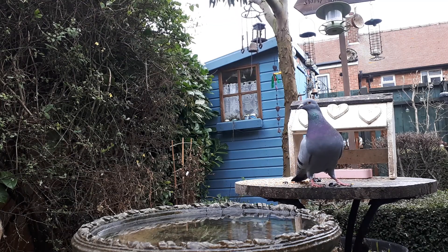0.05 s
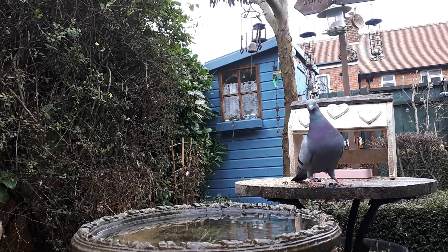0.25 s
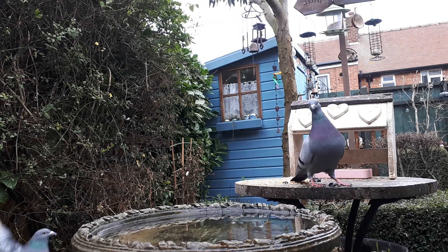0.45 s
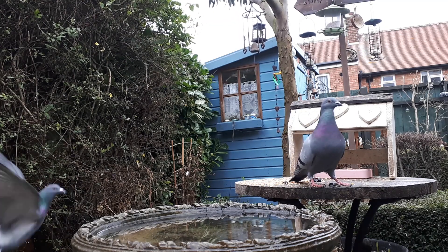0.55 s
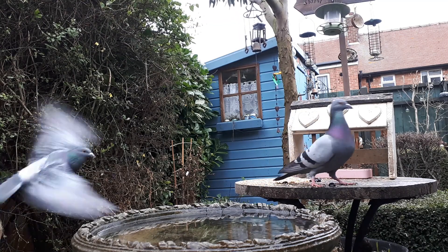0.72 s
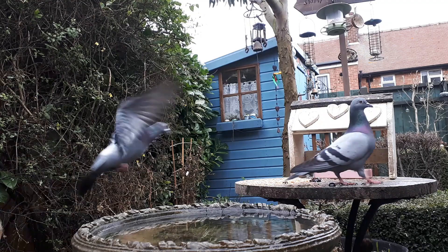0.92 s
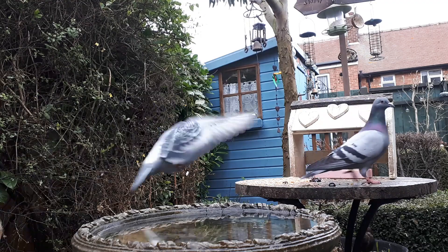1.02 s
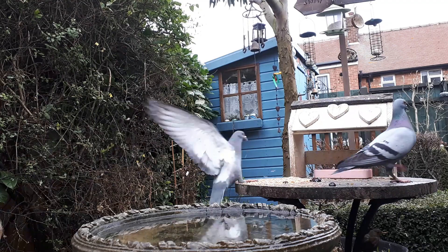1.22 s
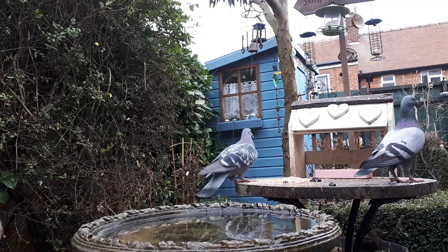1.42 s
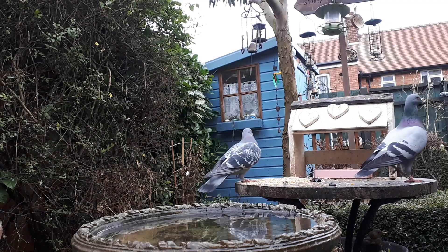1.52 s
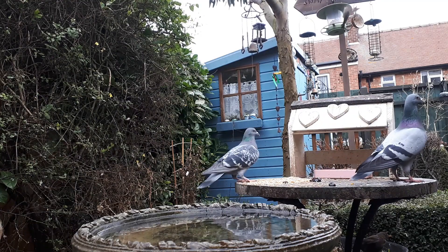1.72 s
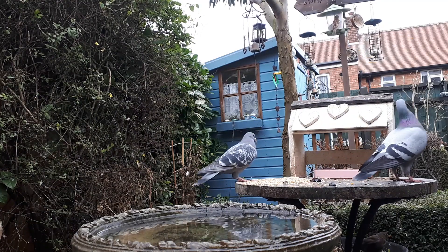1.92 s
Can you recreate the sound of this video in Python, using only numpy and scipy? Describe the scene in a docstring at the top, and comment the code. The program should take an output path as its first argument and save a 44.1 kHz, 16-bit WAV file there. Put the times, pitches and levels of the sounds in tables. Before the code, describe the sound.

Rapid pigeon wing flaps, airy and whistling with snappy feather flicks, end in light knocks and feather rustle; a harsh bird squawks midway and rasps at landing, over faint outdoor rumble, close microphone, mostly left.

```python
"""A pigeon flies in close on the left and lands on a garden table, at about eight downstrokes a second.
Downstrokes: arching whistle tones plus swish and hiss noise. Upstrokes: low hums. Flicks: noise bursts.
Downdraught puffs buffet the microphone. Touchdown: knocks, then wings rustling and squeaking shut.
A harsh-voiced bird in the hedge, perhaps a starling, squawks, then rasps: rough partials and hiss.
Distant town rumble, light gusts and short garden echoes lie around them."""
import sys
import numpy as np
from scipy import signal
from scipy.fft import rfft, irfft
from scipy.io import wavfile
from scipy.ndimage import uniform_filter1d

SR = 44100
rng = np.random.default_rng(int(sys.argv[2]) if len(sys.argv) > 2 else 0)


def unload_wav(signal):
    """Save mono or channel-first audio to the path in sys.argv[1] as 16-bit WAV at rate SR, clipped to [-1, 1]."""
    wavfile.write(
        sys.argv[1],
        SR,
        np.round(np.clip(np.atleast_2d(signal).T, -1, 1) * 32767).astype(np.int16),
    )


N = 85995
T = np.arange(N) / SR

# All spectra: freq_hz, relative_level_db (normalised by colour()).
# Half-widths run from the centre to exp(-2) of the peak.
# Garden air
GARDEN_SPECTRUM = [(20, -0.5), (45, 9.5), (75, 4), (130, -2), (220, -12.5), (450, -17.5), (900, -18),
                   (2000, -30.5), (4000, -35.5), (7500, -34.5), (9000, -39), (15500, -36)]
GARDEN_LEFT_DB, GARDEN_RIGHT_DB, GARDEN_CORRELATION = -55, -57.5, 0.34
# Downdraught puffs: centre_s, peak_spacing_s, peak_db, left_over_right_db
PUFFS = [(.115, 0.0067, -37.5, 18), (0.3254, 0.0032, -29.5, 17), (0.3362, 0.0043, -24, 25),
         (0.366, .005, -31, 30), (0.396, 0.0054, -33, 17), (.617, 0.0035, -29, 20),
         (0.636, 0.0031, -27, 32), (0.659, 0.003, -31.5, 11), (0.676, 0.0035, -25, 25),
         (0.679, 0.0048, -52.5, -23.5), (0.803, 0.0053, -39.5, 17), (.823, 0.0044, -40.5, 18),
         (0.857, 0.0056, -41, 24), (0.953, 0.0028, -40.5, 17), (0.982, 0.0056, -38.5, 23),
         (1.045, 0.0048, -55, -17.5)]
# Pigeon fade-in: its wingbeats come in quickly with the first downstroke
ENTRY_START_S, ENTRY_RISE_S = 0.13, 0.042
# Downstrokes: centre_s, stroke_length_s, whistle_hz, glide_hz_per_s, whistle_db, overtone_db, swish_db,
# hiss_db, left_over_right_db (whistle fundamental)
DOWNSTROKES = [(0.176, .05, 888, -3000, -69, 23, -56, -57.5, 22),
               (0.256, 0.078, 717, -1400, -55, -19, -48, -56.5, 8),
               (.362, 0.066, 720, -700, -43, -0.5, -47, -60.5, 9.5),
               (0.498, .045, 795, 1016, -43.5, 9, -65, -55, 15),
               (.622, 0.054, 686, -900, -43, 3, -51, -56.5, 6.5),
               (0.755, 0.05, 679.4, -1000, -49, 3.5, -59, -60, 14),
               (0.895, .05, 694, 895.5, -43.5, 3.5, -58, -60, 10),
               (1.015, .058, 695.7, 499, -44.5, 0, -54, -61.5, 7.5),
               (1.155, 0.047, 626.3, 3203.5, -42.5, 0.5, -58, -64.5, 5)]
# Whistle partials, fundamental first: relative_level_db
WHISTLE_PARTIALS_DB = [2, -11, -18.5, -29.5]
WHISTLE_ARCH_PER_S2, WHISTLE_JITTER_RMS, WHISTLE_FLUTTER_RMS_DB = 72, 0.0391, 4
# Air through the flight feathers
SWISH_SPECTRUM = [(200, -30), (480, -9.5), (700, 1.5), (1050, 1), (1600, 5.5), (2200, 4), (3200, -5.5),
                  (6000, -24), (15000, -47)]
HISS_SPECTRUM = [(500, 0.5), (2000, -0.5), (3700, -2.5), (6000, 1.5), (7600, 5), (8600, -11), (12000, -7.5),
                 (15500, -8.5)]
# Feather rustles in flight and as the wings shut: centre_s, rustle_length_s, level_db
RUSTLES = [(0.223, .04, -59.5), (1.292, 0.061, -52.5), (1.381, 0.02, -54), (1.424, 0.029, -45),
           (1.475, 0.11, -54), (1.657, 0.11, -60.5)]
RUSTLE_SPECTRUM = [(100, 7), (350, 7.5), (900, 5.5), (1600, 5.5), (4200, 2.5), (6000, 0.5), (7900, -5),
                   (8800, -8.5), (15500, -8.5)]
# Feather flicks at the top of the stroke: start_s, level_db, decay_s
FLICKS = [(.272, -65, .004), (.322, -37, 0.011), (.4475, -43, 0.013), (.574, -36.5, 0.0068),
          (.7025, -39, 0.0084), (.8426, -47, 0.0043), (.857, -53.5, 0.0022), (.972, -45, 0.0077),
          (1.107, -48.5, 0.0085)]
FLICK_SPECTRUM = [(150, 8), (700, 7.5), (1800, 3), (3500, -4.5), (6000, -2.5), (7800, -0.5), (8800, -13.5),
                  (15500, -9.5)]
# Feet and wings knocking the table: start_s, level_db, decay_s
KNOCKS = [(1.237, -38, 0.005), (1.249, -48.5, 0.016), (1.361, -37, 0.0063), (1.417, -44, 0.0068)]
KNOCK_SPECTRUM = [(100, -7), (350, 9.5), (800, 12.5), (1700, 12), (3000, 3.5), (5500, -3), (7600, 4),
                  (8800, -13), (15500, -7)]
# Upstroke hums: centre_s, half_width_s, hum_hz, level_db, left_over_right_db
UPSTROKES = [(0.309, 0.031, 271.3, -41, 7), (0.43, 0.042, 320, -45.5, 9), (.548, 0.046, 330, -53, 4),
             (0.67, 0.12, 299.7, -51, 5), (0.784, 0.067, 300, -52.5, 8), (0.864, 0.028, 280, -51.5, 9),
             (0.94, 0.033, 277.4, -50, 8), (1.044, .02, 290, -48, 5), (1.085, 0.028, 300, -46, 8),
             (1.205, 0.1, 290, -57, 2.5)]
HUM_AIR_SPECTRUM = [(40, -24), (100, -1.5), (300, -5), (500, -3), (900, -13), (3000, -34)]
HUM_JITTER_RMS, HUM_AIR_DB = 0.15, -4  # air rms relative to tone peak
# Harsh bird's call curves: time_s, pitch_hz, level_db,
# brightness_db (per partial above the second, held from the fourth)
SQUAWK = [(.445, 1557, -62, -5), (.46, 1591, -38, 0.5), (.484, 1640, -34.5, 2.5), (.5, 1620, -33, -3.5),
          (.518, 1506, -38.5, -6.5), (.538, 1311, -43.5, -16), (.56, 1070, -49, -14)]
RASP = [(1.274, 1373, -64, -2), (1.284, 1380, -46, 0), (1.33, 1485, -45, -8), (1.404, 1470, -40.5, 5),
        (1.462, 1436, -48.5, 0), (1.476, 1404, -37, -18), (1.535, 1404, -45, -14), (1.55, 1446, -40.5, -8),
        (1.598, 1489, -44.5, 2), (1.604, 1520, -34, -23), (1.613, 1509, -41.5, -11),
        (1.641, 1472, -37.5, 7.5), (1.655, 1448, -43.5, -14), (1.664, 1480, -50, 16)]
# Call partials, fundamental first: relative_level_db
SQUAWK_PARTIALS_DB = [-16, -5.5, -1.5, -2, -29, -22.5, -23.5, -33]
RASP_PARTIALS_DB = [-21, -3, -20, -38]
# Hiss within the calls
SQUAWK_HISS_SPECTRUM = [(500, -6), (1600, -12), (2300, -6), (3300, -1.5), (4600, 6), (5700, -15),
                        (6900, -5), (7600, -4), (8700, -21), (11000, -10), (15500, -16)]
RASP_HISS_SPECTRUM = [(500, -29), (1350, -6.5), (1800, -5), (2400, 8.5), (2950, 5), (3600, 4.5),
                      (4400, 2.5), (5100, -29), (7600, -16), (8700, -36), (15500, -29)]
# Breeze on the microphone: centre_s, gust_length_s, level_db
GUSTS = [(0.557, 0.099, -52.5), (.73, 0.072, -51.5), (1.827, 0.026, -60), (1.94, 0.064, -49)]
GUST_SPECTRUM = [(30, -28), (70, 3.5), (160, -10), (300, -20), (800, -49), (3000, -56)]
# Wing-fold squeaks: centre_s, squeak_length_s, pitch_hz, glide_hz_per_s, level_db
SQUEAKS = [(1.285, 0.023, 5100, -6000, -55), (1.394, .011, 5880, 240000, -44),
           (1.415, 0.025, 7700, -8000, -47)]
# Near reflections from table and bird bath: delay_s, level_db
REFLECTIONS = [(.0049, -17), (0.012, -16)]
ECHO_T60_S, ECHO_RISE_S, ECHO_DB, ECHO_RIGHT_DB = 0.21, 0.0082, -10, -7.5  # right relative to left
LOW_CUT_HZ, TOP_HZ = 75.5, 15650


def undb(db):
    """Decibels to gain."""
    return 10 ** (np.asarray(db) / 20)


def colour(x, spectrum):
    """Filter x by (Hz, dB) points, keeping the power of white noise."""
    hz, db = np.array(spectrum, float).T
    bin_hz = np.arange(N // 2 + 1) * SR / N
    gain = undb(np.interp(np.log(bin_hz + 1), np.log(hz), db))
    return irfft(rfft(x) * gain / np.sqrt(np.mean(gain ** 2)), N)


def noise(spectrum):
    """Coloured noise of about unit rms."""
    return colour(rng.standard_normal(N), spectrum)


def wander(rate_hz):
    """Low-passed noise of unit spread, cornering at rate_hz."""
    bin_hz = np.arange(N // 2 + 1) * SR / N
    lowpass = 1 / np.sqrt(1 + (bin_hz / rate_hz) ** 4)
    x = irfft(rfft(rng.standard_normal(N)) * lowpass, N)
    return x / x.std()


def swell(centre_s, half_width_s):
    """Gaussian rise and fall."""
    return np.exp(-2 * ((T - centre_s) / half_width_s) ** 2)


def phase_of(pitch_hz):
    """Integrate frequency to phase in radians."""
    return 2 * np.pi * np.cumsum(pitch_hz) / SR


def place(x, left_over_right_db):
    """Stereo pair: left as is, right shaded."""
    return np.array([x, x * undb(-left_over_right_db)])


def garden():
    """Distant town rumble and faint hiss: partly correlated stereo noise."""
    shared = np.sqrt(GARDEN_CORRELATION) * noise(GARDEN_SPECTRUM)
    own = np.sqrt(1 - GARDEN_CORRELATION) * np.array([noise(GARDEN_SPECTRUM), noise(GARDEN_SPECTRUM)])
    return (shared + own) * undb([[GARDEN_LEFT_DB], [GARDEN_RIGHT_DB]])


def puffs():
    """Each vortex gives one push and pull of pressure: a Gaussian derivative."""
    out = 0
    for centre_s, peak_spacing_s, peak_db, left_db in PUFFS:
        u = 2 * (T - centre_s) / peak_spacing_s
        pressure = -u * np.exp((1 - u ** 2) / 2)  # unit peaks at u = +-1
        out = out + place(pressure * undb(peak_db), left_db)
    return out


def downstrokes():
    """Flight feathers whistle on an arching pitch while air swishes and hisses through them."""
    out = 0
    swish = noise(SWISH_SPECTRUM)
    hiss = noise(HISS_SPECTRUM) * undb(1.6 * wander(200))
    for (centre_s, length_s, hz, glide_hz_per_s, whistle_db, overtone_db,
         swish_db, hiss_db, left_db) in DOWNSTROKES:
        dt = np.clip(T - centre_s, -length_s, length_s)
        bend = 1 - WHISTLE_ARCH_PER_S2 * dt ** 2 + WHISTLE_JITTER_RMS * wander(161.3)
        phase = phase_of((hz + glide_hz_per_s * dt) * bend)
        flutter_db = WHISTLE_FLUTTER_RMS_DB * wander(68)
        env = undb(whistle_db + flutter_db) * swell(centre_s, 0.65 * length_s)
        for k, partial_db in enumerate(WHISTLE_PARTIALS_DB):
            gain = undb(partial_db + overtone_db * (k > 0))
            # each higher partial is shaded 6 dB more on the right
            out = out + place(gain * np.sin((k + 1) * phase) * env, left_db + 6 * k)
        swish_env = undb(swish_db) * swell(centre_s, 0.94 * length_s)
        hiss_env = undb(hiss_db) * swell(centre_s, 1.73 * length_s)
        out = out + place(swish * swish_env, 74) + place(hiss * hiss_env, 38)
    return out


def rustles():
    """Feathers slide over each other in tiny catches: noise with fast random gain."""
    env = sum(undb(db) * swell(centre_s, 1.21 * length_s) for centre_s, length_s, db in RUSTLES)
    catches = rng.standard_normal(N) * undb(2.3 * wander(900))
    return place(colour(env * catches / catches.std(), RUSTLE_SPECTRUM), 21)


def cracks(table, spectrum, attack_s, left_db):
    """Flicks or knocks: noise bursts with linear attack and exponential decay."""
    env = 0
    for start_s, db, decay_s in table:
        attack = np.clip((T - start_s) / attack_s, 0, 1)
        decay = np.exp(-np.maximum(T - start_s - attack_s, 0) / decay_s)
        env = env + undb(db) * attack * decay
    return place(colour(env * rng.standard_normal(N), spectrum), left_db)


def upstrokes():
    """The lifting wing hums low, with jittered pitch, and stirs the air."""
    out = 0
    air = noise(HUM_AIR_SPECTRUM) * undb(HUM_AIR_DB)
    for centre_s, half_width_s, hz, db, left_db in UPSTROKES:
        tone = np.sin(phase_of(hz * (1 + HUM_JITTER_RMS * wander(79.3))))
        out = out + place(undb(db) * (tone + air) * swell(centre_s, half_width_s), left_db)
    return out


def harsh_call(curve, partials_db, hiss_spectrum, jitter_rms, jitter_hz, smear_rad,
               rough_db, rough_hz, hiss_db, left_db):
    """Unsteady pitch and phase-smeared partials plus hiss, in irregular pulses."""
    at_s, hz, level_db, brightness_db = np.array(curve).T
    phase = phase_of(np.interp(T, at_s, hz) * (1 + jitter_rms * wander(jitter_hz)))
    tilt_db = np.interp(T, at_s, brightness_db)
    tone = 0
    for k, partial_db in enumerate(partials_db):
        gain = undb(partial_db + np.clip(k - 1, 0, 2) * tilt_db)
        tone = tone + gain * np.sin((k + 1) * phase + smear_rad * wander(187))
    tone = tone / np.sqrt(uniform_filter1d(tone ** 2, size=900))  # level over about 20 ms
    pulse = np.sin(phase_of(rough_hz * (1 + 0.194 * wander(110))))
    pulse_gain = undb(rough_db * (pulse + 0.42 * wander(47)))
    voice = (tone + undb(hiss_db) * noise(hiss_spectrum)) * pulse_gain
    env = undb(np.interp(T, at_s, level_db, left=-150, right=-150))
    return place(voice / voice.std() * env, left_db)


def gusts():
    """Light air rumbles on each microphone port: common swells, independent noise."""
    env = sum(undb(db) * swell(centre_s, 0.94 * length_s) for centre_s, length_s, db in GUSTS)
    return env * np.array([noise(GUST_SPECTRUM), noise(GUST_SPECTRUM)])


def squeaks():
    """Folding wings give brief gliding tones with jittered pitch."""
    out = 0
    for centre_s, length_s, hz, glide_hz_per_s, db in SQUEAKS:
        dt = np.clip(T - centre_s, -length_s, length_s)
        pitch_hz = (hz + glide_hz_per_s * dt) * (1 + 0.0243 * wander(424))
        out = out + np.sin(phase_of(pitch_hz)) * undb(db) * swell(centre_s, 0.97 * length_s)
    return place(out, 38)


def echoes(x):
    """Table and bird bath reflect treble; shed, fence and hedge scatter a tail, duller on the right."""
    env = undb(-60 * T / ECHO_T60_S) * np.clip(T / ECHO_RISE_S, 0, 1)
    env = env / np.sqrt(np.sum(env ** 2))
    left_tail = noise([(100, 3.5), (600, 4.5), (3000, 4.5), (7000, -4.5), (15000, -2)])
    right_tail = noise([(100, 27), (600, 9), (3000, 2.5), (7000, -13), (15000, -9)]) * undb(ECHO_RIGHT_DB)
    tails = [left_tail, right_tail]
    wet = np.array([signal.fftconvolve(x, tail * env)[:N] for tail in tails]) * undb(ECHO_DB)
    treble = signal.sosfilt(signal.butter(2, 1200, "high", fs=SR, output="sos"), x)
    near = sum(undb(db) * np.interp(T - delay_s, T, treble) for delay_s, db in REFLECTIONS)
    return wet + place(near, 51)


def scene():
    """Pigeon and harsh bird with echoes, over puffs, gusts and garden air."""
    flicks = cracks(FLICKS, FLICK_SPECTRUM, attack_s=0.001, left_db=30)
    knocks = cracks(KNOCKS, KNOCK_SPECTRUM, attack_s=0.00041, left_db=31)
    pigeon = downstrokes() + rustles() + flicks + upstrokes() + knocks + squeaks()
    entry_gain = np.clip((T - ENTRY_START_S) / ENTRY_RISE_S, 0, 1) ** 2
    squawk = harsh_call(SQUAWK, SQUAWK_PARTIALS_DB, SQUAWK_HISS_SPECTRUM, jitter_rms=0.016, jitter_hz=225,
                        smear_rad=1.16, rough_db=2.5, rough_hz=197.2, hiss_db=-9, left_db=28)
    rasp = harsh_call(RASP, RASP_PARTIALS_DB, RASP_HISS_SPECTRUM, jitter_rms=0.02576, jitter_hz=206.5,
                      smear_rad=1.0, rough_db=3.5, rough_hz=257.5, hiss_db=-7, left_db=26)
    birds = pigeon * entry_gain + squawk + rasp
    return birds + echoes(birds[0]) + puffs() + gusts() + garden()


def record(dry):
    """Thin the deep bass (zero-phase second-order slope) and cut the top (elliptic low-pass)."""
    bin_hz = np.arange(N // 2 + 1) * SR / N
    highpass = bin_hz ** 2 / np.sqrt(bin_hz ** 4 + LOW_CUT_HZ ** 4)
    thinned = irfft(rfft(dry) * highpass, N)
    return signal.sosfilt(signal.ellip(10, 0.2, 70, TOP_HZ, fs=SR, output="sos"), thinned)


dry = scene()
out = record(dry)
unload_wav(out)
```